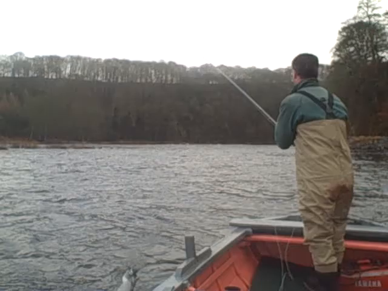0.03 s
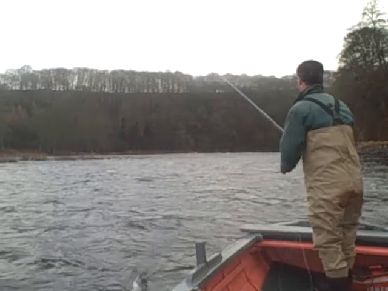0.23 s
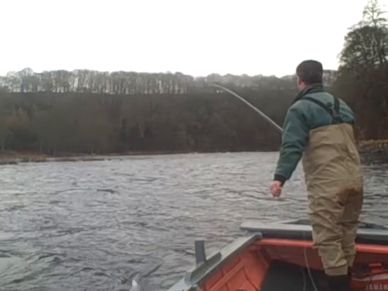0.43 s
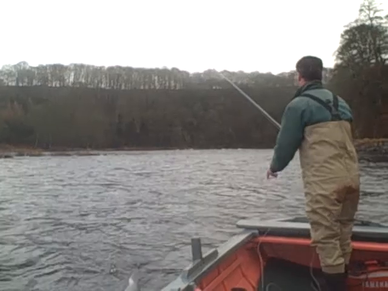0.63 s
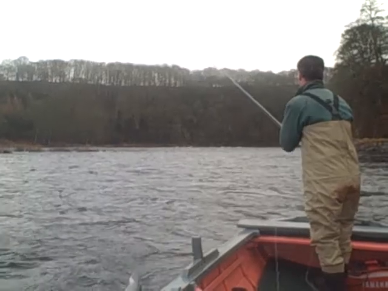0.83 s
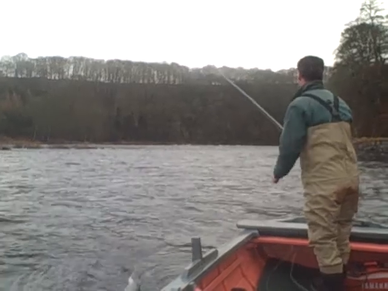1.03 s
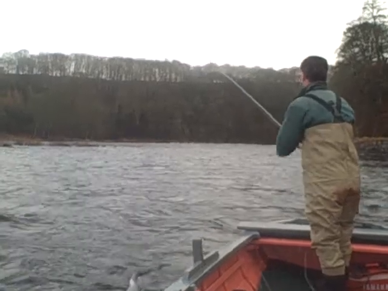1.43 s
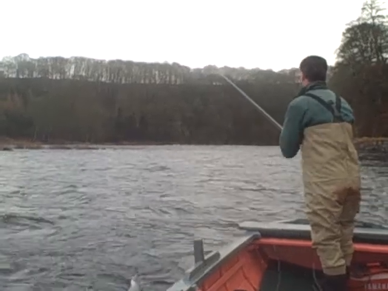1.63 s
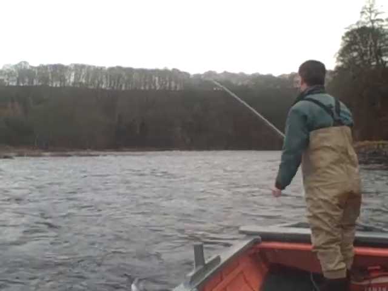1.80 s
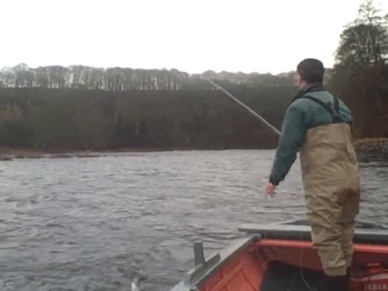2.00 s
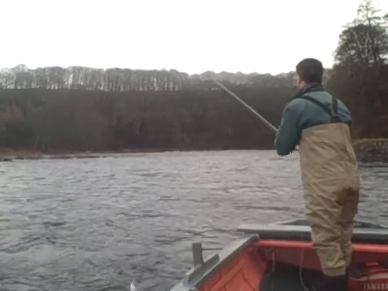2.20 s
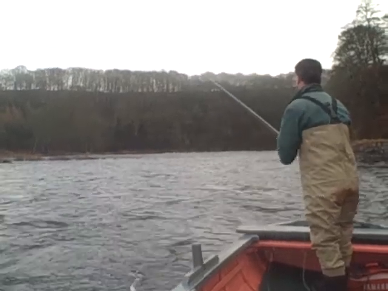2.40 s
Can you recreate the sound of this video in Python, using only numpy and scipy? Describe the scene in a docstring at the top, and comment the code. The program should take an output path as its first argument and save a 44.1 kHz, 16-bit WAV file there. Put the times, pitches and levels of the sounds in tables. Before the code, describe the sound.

One sharp, close knock on a camera's case comes first, with a short low rumble. Then soft bumps and small ticks dot the faint rush of a river around a boat, with light wind on the microphone.

```python
"""A soft bump, then one hard knock on the case of a hand-held camera, right at its microphone.
The knock overloads it and a few weak ones follow; then come soft handling bumps and tiny ticks.
We are in a small boat on a wide river: the current rushes faintly all round, and light wind sways
on the microphone. The treble hiss lifts twice, and the camera adds a thin whine of its own."""
import sys
import numpy as np
from scipy import signal
from scipy.fft import rfft, irfft, next_fast_len
from scipy.io import wavfile
from scipy.ndimage import uniform_filter1d, map_coordinates

SR = 44100
rng = np.random.default_rng(int(sys.argv[2]) if len(sys.argv) > 2 else 0)


def wav_out(sig):
    """Save sig, one row per channel (or a flat mono array), as 16-bit PCM at SR to the path in sys.argv[1]."""
    wavfile.write(sys.argv[1], SR, np.round(np.clip(np.atleast_2d(sig).T, -1, 1) * 32767).astype(np.int16))


N = 112454

# Knocks on the camera's case, the hard one first.
# Each row: start in seconds, gain in dB, dullness in dB per octave, contact time in seconds.
CASE_KNOCKS = [(0.1236, -0.5, -0.5, 0.001613), (0.212, -26, 12, 0.00073), (0.2158, -25, 25, 0.00077),
               (.2684, -33, 14, 0.0035)]


def knocks():
    """Each contact on the case pushes, cracks and rings its modes; soft ones ring only the low modes."""
    # Modes of the case. Each row: pitch in Hz, relative level in dB, seconds to fall by 60 dB.
    case_modes = [(409, .5, .044), (400, -32, .2), (537, -8, .034), (931, 6.2, .0069), (1512, -5, .0106),
                  (2075, 6.2, .0097), (2335, -6, .014), (2523, 10, .0072), (3400, -15, .009),
                  (3110, -53, .15)]
    push_db, ring_lag_s = 12.5, .00028
    crack_db, crack_t60_s, crack_hz = -23.5, .028, 2000
    out = np.zeros(N)
    for start, db, dull_db, contact_s in CASE_KNOCKS:
        t = np.maximum(clock() - start, 0)
        ring_t = np.maximum(t - ring_lag_s, 0)
        loss_db = lambda hz: dull_db * np.log2(hz / case_modes[0][0])
        push = amp(push_db - dull_db) * np.sin(np.pi * np.minimum(t / contact_s, 1))
        ring = sum(amp(mode_db - loss_db(hz) - 60 * ring_t / t60) * np.sin(2 * np.pi * hz * ring_t)
                   for hz, mode_db, t60 in case_modes)
        grit = unit(filtered(rng.standard_normal(N), lambda hz: 1 / (1 + 1j * hz / crack_hz) ** 2))
        crack = amp(crack_db - loss_db(crack_hz) - 60 * t / crack_t60_s) * grit * (t > 0)
        out += amp(db) * (push + ring + crack)
    return out


def camera_shake():
    """The jolted camera rumbles deeply, most at the hard knock, and settles."""
    # The rumble's spectrum. Each row: frequency in Hz, relative density in dB.
    spectrum = [(6, 10.5), (15, 7), (30, -13), (60, -28), (150, -44), (400, -63)]
    jolt_s, fade_s = CASE_KNOCKS[0][0], .13
    swell = np.exp(-np.abs(clock() - jolt_s) / fade_s)
    return amp(-20) * swell * rush(spectrum, patchy_db=2.5)


def grip_rub():
    """The hand rubs on the case round the knocks, then holds still."""
    # The friction's spectrum. Each row: frequency in Hz, relative density in dB.
    spectrum = [(60, -5), (200, -6), (420, 0), (800, -15), (1300, -12), (2200, -18), (4200, -20),
                (5200, -30), (9000, -33), (15000, -46)]
    end_s, release_s = .28, .017
    release = np.exp(-np.maximum(clock() - end_s, 0) / release_s)
    return amp(-49 + .51 * wobble(40)) * release * rush(spectrum, patchy_db=4)


def handling_bumps():
    """Soft pushes and pulls on the camera that do not ring, each with a shallow rebound."""
    # Each row: time in seconds, level in dB, half width in seconds, +1 for a push or -1 for a pull.
    nudges = [(.079, -16, 0.0012, -1), (0.78, -32.5, 0.0021, 1), (0.842, -45.5, .001, 1),
              (.911, -35, .0014, 1), (0.9783, -29, 0.0015, 1), (1.0562, -27.5, 0.0017, 1),
              (1.159, -30, 0.0016, 1), (1.647, -36.5, 0.00086, 1), (1.748, -34.5, 0.0052, 1),
              (1.792, -51.5, .0015, -1), (1.918, -30.5, 0.0068, -1), (1.948, -34, 0.002, 1),
              (1.9528, -39, 0.0013, 1), (2.1003, -31, .0012, 1), (2.2, -34.5, .0013, 1)]
    rebound_share, rebound_lag_s, top_hz = .52, .0035, 696
    out = np.zeros(N)
    for at_s, db, width_s, direction in nudges:
        t = clock() - at_s
        push = np.exp(-np.abs(t) / width_s)
        rebound = rebound_share * np.exp(-((t - rebound_lag_s) / (2 * width_s)) ** 2)
        out += direction * amp(db) * (push - rebound)
    return filtered(out, lambda hz: 1 / np.hypot(1, hz / top_hz))


def ticks():
    """Tiny pips of a few cycles, with a shorter overtone and a little grit."""
    # Each row: time in seconds, level in dB, pitch in Hz, rise and decay time in seconds,
    # overtone in Hz, overtone level in dB against the pip.
    pips = [(.1895, -48, 4070, 0.0002, 6560, 5), (0.507, -58, 6500, .0004, 8150, -9),
            (0.5482, -42.5, 7300, 0.000077, 11680, 6), (0.6176, -45, 2510, 0.00064, 3200, -25),
            (0.635, -53, 2100, 0.0028, 2800, -18), (1.007, -43, 2820, 0.00078, 4650, -4),
            (1.159, -54.5, 2490, 0.0015, 4140, 2.5), (1.667, -52.5, 1750, .002, 3000, -24.5),
            (1.87, -53, 2133, 0.0014, 3900, -3), (2.415, -44.5, 2454, 0.0012, 5740, -1)]
    grit_share, grit_top_hz, overtone_life_ratio = .11, 7000, .38
    grit = unit(filtered(rng.standard_normal(N), lambda hz: 1 / (1 + (hz / grit_top_hz) ** 2) ** 2))
    out = np.zeros(N)
    for at_s, db, hz, decay_s, over_hz, over_db in pips:
        t = clock() - at_s
        pip = np.exp(-np.abs(t) / decay_s) * (np.sin(2 * np.pi * hz * t) + grit_share * grit)
        overtone = np.exp(-np.abs(t) / (overtone_life_ratio * decay_s)) * np.sin(2 * np.pi * over_hz * t)
        out += amp(db) * (pip + amp(over_db) * overtone)
    return out


def river():
    """The current rushes faintly all round the boat, even but slightly restless."""
    # The water's spectrum. Each row: frequency in Hz, relative density in dB.
    spectrum = [(71, -26.5), (120, -39), (130, -4), (170, -4), (236, -4.5), (272, -3.5), (385, 1),
                (473, -7), (546, -4.5), (592, -11), (742, -16), (839, -20), (1010, -21.5), (1240, -10.5),
                (1520, -17.5), (2640, -18.5), (3380, -26.5), (5410, -29), (6500, -32.5), (11300, -28.5),
                (16000, -35)]
    # The current's loudness at the microphone. Each row: time in seconds, level in dB.
    loudness = [(.32, -59.5), (.65, -58), (1.0, -57), (1.298, -58), (1.499, -57), (1.75, -57), (2.1, -58.5),
                (2.54, -59)]
    level_db = np.interp(clock(), *np.transpose(loudness)) + .44 * wobble(3)
    return amp(level_db) * rush(spectrum, patchy_db=1.47)


def wind():
    """Light air sways right on the microphone as a very low rumble."""
    # The wind's spectrum. Each row: frequency in Hz, relative density in dB.
    spectrum = [(8, -14.5), (14, 9), (25, -7.5), (45, -15.5), (90, -17.5), (180, -55.5), (400, -73)]
    return amp(-45.5 + 1.2 * wobble(8.8)) * rush(spectrum, patchy_db=.2)


def hiss():
    """Two faint spells of high hiss."""
    # Each row: start in seconds, end in seconds, level in dB.
    spells = [(0.782, 0.826, -69.5), (1.374, 1.551, -72.5)]
    # The spectrum of the hiss. Each row: frequency in Hz, relative density in dB.
    spectrum = [(4000, -3.5), (7800, 0), (10000, 8), (12700, 8), (13300, -13.5), (16000, -8)]
    t, ramp_s = clock(), .0081
    level = sum(amp(db) * np.clip(np.minimum(t - start, end - t) / ramp_s, 0, 1)
                for start, end, db in spells)
    return level * rush(spectrum, patchy_db=1.5)


def camera_whine():
    """Thin high tones from the camera's electronics, each wavering in phase."""
    # Each row: pitch in Hz, rms level in dB.
    tones = [(11007, -86.5), (11331, -84), (11654, -84.5), (11978, -89), (12626, -96.5), (13273, -90.5),
             (15271, -92.5)]
    waver_rad = .7
    return sum(np.sqrt(2) * amp(db) * np.sin(2 * np.pi * hz * clock() + waver_rad * wobble(14))
               for hz, db in tones)


def rush(spectrum, patchy_db):
    """Noise of rms 1, shaped by (Hz, dB) points, with random patches of gain in time and frequency."""
    cells = signal.stft(rng.standard_normal(N), nperseg=512)[2]
    patches = uniform_filter1d(rng.standard_normal(cells.shape), size=6, axis=0)
    patches = uniform_filter1d(patches, size=10, axis=1)
    noise = signal.istft(cells * amp(patchy_db * unit(patches)), nperseg=512)[1][:N]
    point_hz, point_db = np.transpose(spectrum)
    colour = lambda hz: amp(np.interp(np.log(hz + 1), np.log(point_hz + 1), point_db))
    return unit(filtered(noise, colour))


def filtered(x, response):
    """x through a filter whose complex gain is response(hz)."""
    size = next_fast_len(N + SR // 2)
    return irfft(rfft(x, size) * response(np.fft.rfftfreq(size, 1 / SR)), size)[:N]


def wobble(rate):
    """A smooth random curve, rate knots a second."""
    return map_coordinates(rng.standard_normal(int(N * rate / SR) + 4), [clock() * rate])


def amp(db):
    """Decibels to gain."""
    return 10 ** (np.asarray(db) / 20)


def unit(x):
    """x scaled to rms 1."""
    return x / np.sqrt(np.mean(x ** 2) + 1e-20)


def clock():
    """The time of every sample in seconds."""
    return np.arange(N) / SR


def scene():
    """River, wind and the close sounds of the camera, all at its one microphone."""
    outdoors = river() + wind()
    handling = knocks() + camera_shake() + grip_rub() + handling_bumps()
    return (outdoors + handling + ticks() + camera_whine() + hiss())[None]


def record(dry):
    """The camera's input opens, blocks the lowest drift, clips on overload and cuts the highest treble."""
    open_s, ramp_s = .077, .002
    low_cut_hz, ceiling, top_hz = 6.7, .71, 16400
    opened = dry[0] * np.clip((clock() - open_s) / ramp_s + 1, 0, 1)
    drift_free = filtered(opened, lambda hz: 1j * hz / (low_cut_hz + 1j * hz))
    clipped = np.clip(drift_free, -ceiling, ceiling)
    return filtered(clipped, lambda hz: hz < top_hz)[None]


dry = scene()
out = record(dry)
wav_out(out)
```